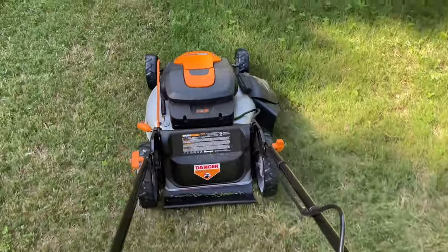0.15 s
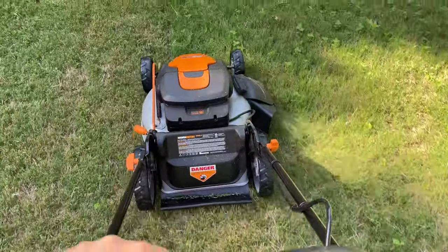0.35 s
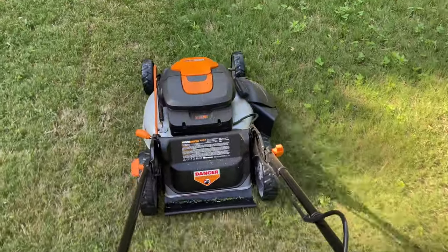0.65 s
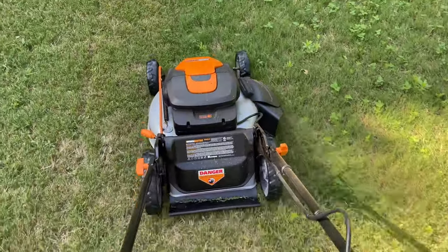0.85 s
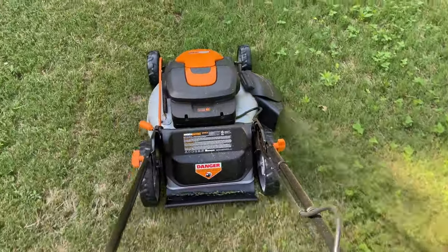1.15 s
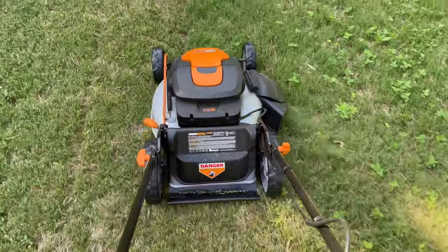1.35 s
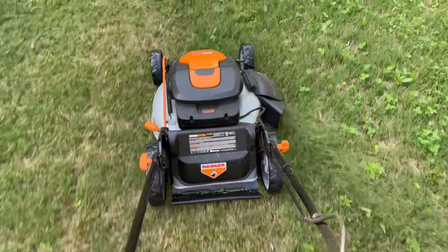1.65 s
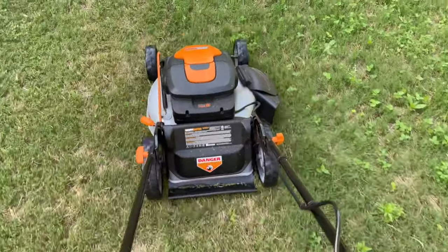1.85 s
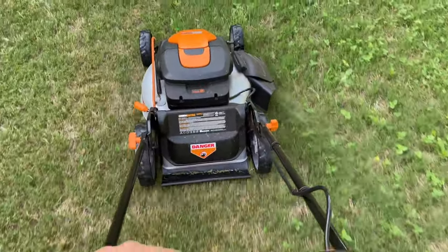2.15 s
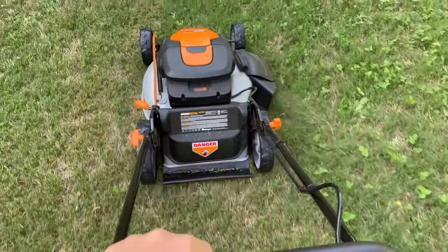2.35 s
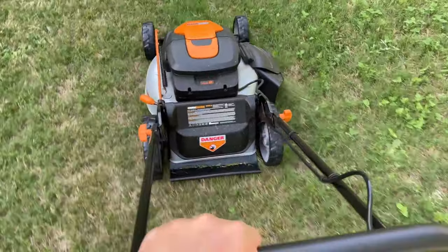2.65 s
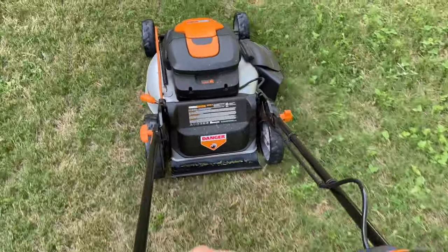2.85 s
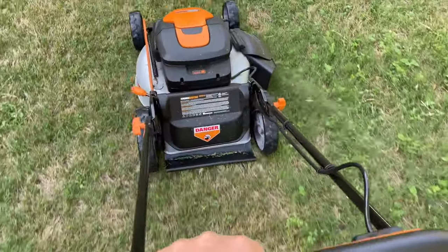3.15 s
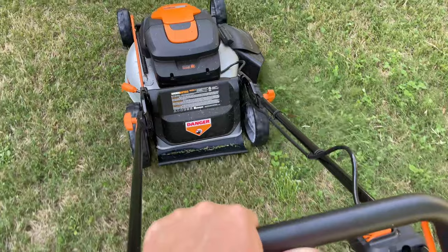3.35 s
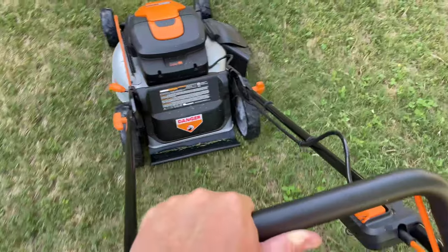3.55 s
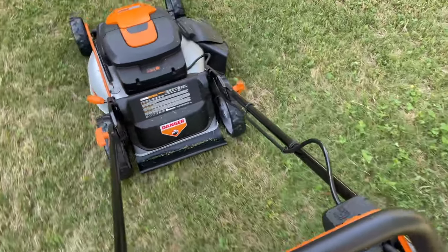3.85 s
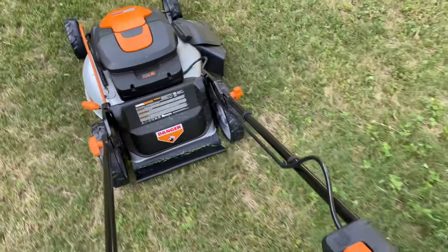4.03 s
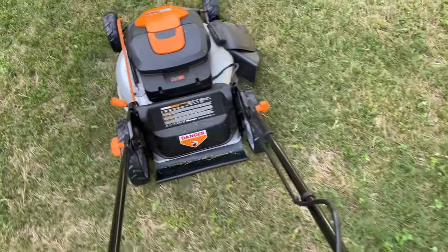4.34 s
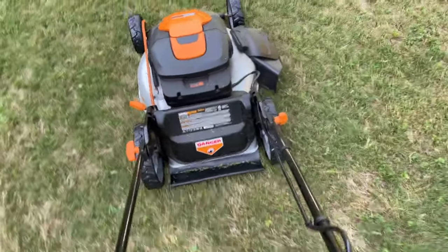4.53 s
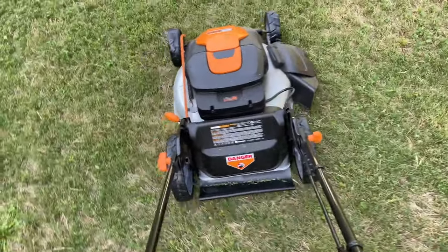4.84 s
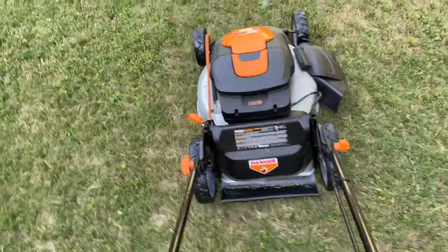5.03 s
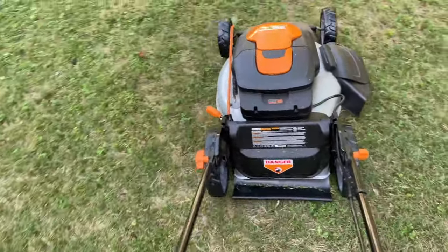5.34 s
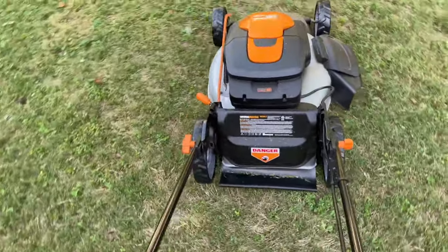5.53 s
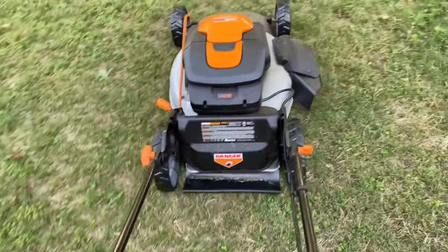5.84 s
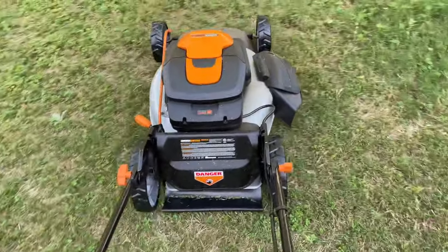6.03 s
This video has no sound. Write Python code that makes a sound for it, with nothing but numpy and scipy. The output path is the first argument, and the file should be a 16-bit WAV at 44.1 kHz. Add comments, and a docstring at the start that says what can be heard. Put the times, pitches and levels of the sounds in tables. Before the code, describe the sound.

A battery push mower drones close up through grass, with roaring air, hissing stalks and a brief crackle of a twig.

```python
"""Battery mower on dry grass

Close up, from the handle, on a two-port microphone that the wind bumps now and then. The blade drones
on multiples of its pass rate, air roars from the side chute, the deck rumbles and cut stalks hiss.
A twig rattles through; later the grass thins, the blade speeds up and the air roar takes over."""
import sys
import numpy as np
from scipy import signal
from scipy.fft import rfft, irfft, next_fast_len
from scipy.io import wavfile
from scipy.ndimage import uniform_filter1d, minimum_filter1d

SR = 44100
rng = np.random.default_rng(int(sys.argv[2]) if len(sys.argv) > 2 else 0)


def transcribe(u):
    """Save the signal u as a 16-bit wav file named by the first command-line argument.

    u: samples, shape (n,) or (channels, n), limited to [-1, 1]; the rate is SR.
    q: integer samples, one column per channel.
    """
    v = np.clip(np.atleast_2d(u).T, -1, 1)
    q = np.round(v * 32767).astype(np.int16)
    wavfile.write(sys.argv[1], SR, q)


N = 272979

# Blade: t/s, pass rate/Hz, first harmonic/dB, second harmonic/dB
BLADE_TRACK = [(0, 97.5, -32, -21), (.12, 96.5, -35, -23.5), (.25, 97.54, -36, -21.5),
               (.55, 97.6, -34.5, -22.5), (1.05, 94.34, -32, -24.5), (1.6, 95.5, -31.5, -22),
               (2.0, 97.64, -32, -22.5), (2.28, 96.4, -33, -20), (2.9, 96.6, -32, -22.5),
               (3.2, 97.64, -31.5, -22), (3.36, 96.5, -30.5, -20.5), (3.62, 97.96, -31, -23),
               (3.82, 99.86, -30.5, -18.5), (4.08, 101.2, -28.5, -17), (4.45, 103, -36.5, -18.5),
               (4.8, 104.2, -38, -17.5), (5.07, 103.9, -34.5, -16), (5.25, 104.2, -40.5, -16.5),
               (6.19, 105, -38, -16.5)]
# Strong harmonics: number, phase/rad, pan/dB (always left minus right), left lead in thin grass/rad
STRONG_HARMONICS = [(1, .5, 5.5, 1.3), (2, 0, 1.2, -.09), (3, 3.1, 1.3, -.26), (4, 2.7, .8, -1.2)]
# Weak harmonics: number, level in thick grass/dB, level in thin grass/dB
WEAK_HARMONICS = [(5, -39.5, -44), (6, -40, -39), (7, -44, -52), (10, -54, -35), (11, -59, -36.5),
                  (12, -46, -50.5)]
# Brief fades of one harmonic: t/s, number, depth/dB, half length/s
HARMONIC_FADES = [(0.015, 3, -9, 0.028), (0.143, 3, -16, 0.036), (0.388, 3, -12, 0.077),
                  (0.985, 3, -10, 0.077), (1.582, 3, -14, 0.027), (1.779, 3, -6, .05),
                  (2.121, 3, -13, 0.055), (2.518, 3, -14, 0.028), (2.78, 3, -14, 0.058),
                  (2.93, 3, -15, 0.039), (3.29, 3, -23, 0.032), (3.85, 3, -7.5, .1), (4.7, 3, -7, 0.035),
                  (4.866, 3, -8, 0.038), (5.35, 3, -1.5, .1), (.96, 1, -6.5, 0.049), (4.248, 1, -16, 0.094),
                  (3.965, 2, -3.5, 0.08), (1.048, 4, -12, 0.049), (1.898, 4, -8, 0.19),
                  (2.166, 4, -8, 0.034), (2.453, 4, -15, 0.024), (3.92, 4, -7, 0.17), (4.78, 4, -10, 0.13),
                  (5.32, 4, -13, .04), (6.05, 4, -15, .12)]
# Mowing noise: t/s, deck rumble/dB, chute roar/dB, stalk hiss/dB, chute howl/dB, howl pan/dB
NOISE_LEVELS = [(0, -30, -34, -38, -37.5, -4), (.4, -29, -33, -40.5, -34.5, -1),
                (.85, -27, -31.5, -36.5, -35.5, -0.5), (1.25, -30, -34, -40.5, -37, -3),
                (1.5, -30, -32, -37, -32.5, -2), (1.9, -31, -32, -40.5, -33, -2),
                (2.25, -28.5, -31, -37.5, -34.5, -1.5), (2.65, -29.5, -31, -38, -31.5, -1),
                (3.2, -30, -32.5, -39, -35.5, -0.5), (3.5, -29.5, -32.5, -42, -33.5, -1),
                (3.75, -31, -33, -48, -29, 0), (4.12, -32, -31.5, -53, -32, -0.5),
                (4.5, -34, -31.5, -50, -29, -2.5), (4.9, -33.5, -29.5, -46, -29.5, -6),
                (5.2, -31.5, -29.5, -55, -32, -14), (5.47, -33.5, -30, -56, -28.5, -10),
                (5.75, -32.5, -28.5, -56, -29, -6.5), (6.19, -33.5, -28, -47.5, -31.5, -10)]
# Noise spectra: f/Hz, relative density/dB
THICK_GRASS_ROAR = [(500, -36), (850, -7), (1150, -11.5), (1350, 2.5), (1750, -5.5), (2050, -3),
                    (2500, -11), (2800, -8), (3900, -16), (4800, -19), (6200, -20.5), (7500, -24),
                    (9000, -32), (16000, -52)]
THIN_GRASS_ROAR = [(450, -46), (800, 1.5), (1100, -9.5), (1500, 0), (1800, -6.5), (2050, -7), (2900, -10),
                   (4000, -13.5), (5000, -13), (6200, -17.5), (7500, -28.5), (9000, -53), (13500, -52),
                   (16000, -56)]
CHUTE_HOWL = [(600, -37), (900, 1.5), (1100, 12), (1300, 7), (1700, -67)]
DECK_RUMBLE = [(20, -45), (38, -29), (60, -11), (85, 3), (150, 4), (250, 12.5), (450, 7), (650, 4.5),
               (800, -7), (1100, -22)]
STALK_HISS = [(1500, -6), (3000, -7.5), (5000, 10.5), (7000, 2), (8200, 4.5), (10000, 3), (12500, -0.5),
              (14000, 6), (15500, -0.5), (17000, -33.5)]
# Blade on twig and hard stalks: t/s, peak rms level/dB, colour centre/Hz, t60/s, rise/s
BLADE_STRIKES = [(.095, -30, 11000, .03, .002), (.119, -26, 11000, .025, .002),
                 (.7215, -14.5, 4200, .036, .003), (.784, -25, 6800, .03, .002),
                 (.794, -25, 4800, .05, .002), (.8205, -14, 11000, .035, .0015),
                 (.8245, -14, 900, .045, .002), (.8445, -24, 12000, .035, .002),
                 (.860, -22, 5000, .06, .004), (.8965, -17, 12000, .025, .0015),
                 (.903, -9.5, 2900, .045, .007), (.950, -15.5, 4000, .025, .002),
                 (1.239, -32, 14000, .05, .004), (1.715, -24, 13000, .025, .002),
                 (1.828, -32, 12000, .05, .004), (2.146, -29, 11000, .03, .002),
                 (2.305, -30, 12000, .035, .002), (2.484, -28, 11000, .035, .002),
                 (2.695, -27, 14000, .035, .002), (2.717, -32, 4000, .03, .002),
                 (3.032, -27, 12000, .035, .002), (3.139, -32, 3500, .03, .002),
                 (3.54, -31, 12000, .05, .002), (4.615, -34, 13000, .035, .002),
                 (4.852, -31, 12000, .06, .002), (4.93, -37, 13000, .05, .004),
                 (4.96, -37, 13000, .04, .003), (5.0, -34, 13000, .035, .002),
                 (5.131, -32, 13000, .04, .004)]
# One twig knock, then low wind bumps on the ports: t/s, level/dB, f/Hz, t60/s, pan/dB
THUMPS = [(.8245, -12, 880, 0.034, 0), (1.92, -31, 79.7, 0.19, -10), (2.1, -29, 66.35, 0.21, 6),
          (3.799, -39, 106.6, 0.22, -19), (3.859, -33, 90, 0.16, -12)]
# Likeness of left and right, the highest treble heard in mono: f/Hz, coherence/0-1
STEREO_LIKENESS = [(40, .4), (100, .9), (250, .98), (600, .85), (830, .55), (1150, .9), (1750, .6),
                   (2800, .72), (4000, .25), (4800, .65), (5500, .2), (6000, .6), (7300, .3), (9000, .86),
                   (10800, .35), (11800, .985)]
# Phase between left and right: f/Hz, left lead/rad
STEREO_LEAD = [(500, 0), (1100, -.1), (1550, -.9), (2100, -.1), (2900, 1.4), (5000, 1.2), (5700, 3.6),
               (7000, 5.8), (7600, 3.7), (9200, 3.1), (10300, 2.4), (11300, .1), (11800, 0)]
# Balance of left and right: f/Hz, pan/dB
STEREO_PAN = [(45, 0), (80, 4), (120, 4), (180, 1.3), (650, 2), (1000, 0), (2500, -1.5), (4300, 0),
              (4800, 2), (7500, 1), (9000, -1), (11000, 0)]
# Shadow of the recorder's body: f/Hz, width/Hz, depth/dB
BODY_SHADOW = (5580, 214, -7.5)

FREE_HZ, SAG_HZ = 105, 8  # unloaded pass rate, and its drop in thick grass
THIRD_DB, FOURTH_DB = (-26, -27), (-35, -38)  # harmonics in (thick, thin) grass
CHUTE_PAN_DB = -3.5
THRESHOLD_DB, RECOVER_DB_PER_S, BAND_LIMIT_HZ = -24.5, 120, 15850
SIDES = np.array([[.5], [-.5]])  # splits a pan or a phase lead between left and right


def blade_drone(turn, first_db, second_db, thick):
    """Pressure pulses of the passing blade tips: strong harmonics, weak ones wavering with the grass."""
    fourth_db = by_grass(FOURTH_DB, thick) + 3 * wander(7.1)
    strong_db = [first_db, second_db, by_grass(THIRD_DB, thick), fourth_db]
    t, out = np.arange(N) / SR, np.zeros((2, N))
    for (k, phase, pan_db, lead), db in zip(STRONG_HARMONICS, strong_db):
        fade_db = sum(depth * np.exp(-((t - s) / half) ** 2)
                      for s, number, depth, half in HARMONIC_FADES if number == k)
        angle = k * turn + phase + .32 * wander(4.5) + lead * (1 - thick) * SIDES
        out += gain_of(db + fade_db + .81 * wander(20) + pan_db * SIDES) * np.cos(angle)
    lead = (.3 + .5 * (1 - thick) + .25 * wander(1.5)) * SIDES  # the source shifts across the ports
    for k, *levels_db in WEAK_HARMONICS:
        db = by_grass(levels_db, thick) + (1.07 + 2.4 * thick) * wander(12.4)
        jitter = (.046 * k + .4 * thick) * wander(17)
        out += gain_of(db) * np.cos(k * turn + jitter + 2 * np.pi * rng.random() + lead)
    return np.sqrt(2) * out


def chute_air(roar_db, howl_db, howl_pan_db, turn, thick):
    """Air leaves the side chute in one puff a pass and howls in its mouth; thick grass smears the puffs."""
    puffs = 1 + (.25 - .13 * thick) * np.cos(turn + 1.1)
    flutter_db = 1.5 * wander(30)  # the jet flaps in the mouth
    howl = gain_of(howl_db + flutter_db + howl_pan_db * SIDES) * stereo_noise(CHUTE_HOWL, patchy_db=1.25)
    rush = np.sqrt(thick) * stereo_noise(THICK_GRASS_ROAR, patchy_db=1.35)
    rush += np.sqrt(1 - thick) * stereo_noise(THIN_GRASS_ROAR, patchy_db=1.3)
    roar = gain_of(roar_db + .7 * wander(28) + CHUTE_PAN_DB * SIDES) * rush
    return (roar + howl) * puffs


def deck_rumble(db, turn):
    """Clippings and air tumble inside the housing, stirred at each pass."""
    surge_db = 1.2 * wander(10)
    return gain_of(db + surge_db) * stereo_noise(DECK_RUMBLE, patchy_db=2.5) * (1 + .011 * np.cos(turn))


def stalk_hiss(db, turn):
    """Many tiny snaps of cut stalks, a few of them large, merge into a hiss."""
    snap_db = 6.7 * np.minimum(rng.exponential(1, N), 2.8)
    snaps = gain_of(snap_db) * (rng.random(N) < 90 / SR)  # about 90 a second
    decay = gain_of(-60 * np.arange(900) / SR / .023)
    grain = evened(1 + .21 * signal.oaconvolve(snaps, decay)[:N])
    spray = stereo_noise(STALK_HISS, patchy_db=.8)
    return gain_of(db + 1.2 * wander(13)) * spray * grain * (1 + .1 * np.cos(turn + .8))


def blade_strikes():
    """The blade meets a twig or hard stalk: a short crackling burst around its own colour."""
    crack = stereo_noise([(300, -14), (1200, -6), (3000, 2), (6500, 2), (9000, -2), (16000, -2)],
                         patchy_db=1.5)
    jerks_db = 2.2 * evened(uniform_filter1d(rng.standard_normal(N), size=30))  # wood breaks in jerks
    crack *= gain_of(jerks_db)
    size = 4096
    out, t, hz = np.zeros((2, N + size)), np.arange(size) / SR, np.fft.rfftfreq(size, 1 / SR)
    for s, db, centre_hz, t60, rise in BLADE_STRIKES:
        at = round(s * SR)
        colour_db = 13 * np.exp(-(np.log((hz + 1) / centre_hz) / .7) ** 2)
        burst = irfft(rfft(crack[:, at:at + size]) * gain_of(colour_db))
        swell = np.minimum(t / rise, 1) * gain_of(-60 * np.maximum(t - rise, 0) / t60)
        out[:, at:at + size] += gain_of(db) * evened(burst * swell) * np.sqrt(np.mean(swell ** 2))
    return out[:, :N]


def thumps():
    """Low wind bumps on the microphone ports, and one higher knock from the twig."""
    t, out = np.arange(N) / SR, np.zeros((2, N))
    for s, db, hz, t60, pan_db in THUMPS:
        age = np.maximum(t - s, 0)
        tone = np.sin(2 * np.pi * hz * age) * np.minimum(age * hz, 1)
        out += gain_of(db - 60 * age / t60 + pan_db * SIDES) * tone
    return out


def stereo_noise(spectrum, patchy_db):
    """Noise of rms 1 with drifting patches, partly alike in left and right."""
    frames, hz = N // 256 + 5, np.fft.rfftfreq(1024, 1 / SR)
    a, b, c, d, patches = rng.standard_normal((frames, 513, 5)).T
    patches = uniform_filter1d(patches, size=12, axis=0)  # across frequency
    patches = evened(uniform_filter1d(patches, size=10, axis=1))  # across time
    right, unrelated = a + 1j * b, c + 1j * d
    alike = at_hz(STEREO_LIKENESS, hz)
    left = alike * right * np.exp(1j * at_hz(STEREO_LEAD, hz)) + np.sqrt(1 - alike ** 2) * unrelated
    tilt = gain_of(at_hz(STEREO_PAN, hz) / 2)
    pair = np.array([left * tilt, right / tilt]) * gain_of(at_hz(spectrum, hz) + patchy_db * patches)
    return evened(signal.istft(pair, nperseg=1024, noverlap=768)[1][:, :N])


def wander(rate_hz):
    """Random drift of rms 1, mostly slower than the given rate."""
    steps = np.arange(2048)
    rolloff = 1 + (steps[:1025] * SR / N / rate_hz) ** 4
    slow = irfft(rfft(rng.standard_normal(2048)) / rolloff)
    return np.interp(np.linspace(0, 2047, N), steps, evened(slow))


def by_grass(levels, thick):
    """Blends a (thick grass, thin grass) pair."""
    return thick * levels[0] + (1 - thick) * levels[1]


def gain_of(db):
    """Decibels to a factor."""
    return 10 ** (np.asarray(db) / 20)


def evened(x):
    """Scales to rms 1."""
    return x / np.sqrt(np.mean(abs(x) ** 2) + 1e-20)


def at_hz(points, hz):
    """Reads a table on a log-frequency axis, as a column."""
    f, value = np.transpose(points)
    return np.interp(np.log(hz + 1), np.log(f + 1), value)[:, None]


def curves(rows):
    """Each column of a timed table as a value per sample."""
    s, *columns = np.transpose(rows)
    return [np.interp(np.arange(N) / SR, s, c) for c in columns]


def scene():
    """The mower from the handle, its drone and noise pulsing with the blade."""
    pass_hz, first_db, second_db = curves(BLADE_TRACK)
    rumble_db, roar_db, hiss_db, howl_db, howl_pan_db = curves(NOISE_LEVELS)
    turn = 2 * np.pi * np.cumsum(pass_hz) / SR  # one cycle a blade pass
    thick = np.clip((FREE_HZ - pass_hz) / SAG_HZ, 0, 1)  # thick grass slows the blade
    hum = blade_drone(turn, first_db, second_db, thick) + deck_rumble(rumble_db, turn)
    air = chute_air(roar_db, howl_db, howl_pan_db, turn, thick)
    return hum + air + stalk_hiss(hiss_db, turn) + blade_strikes() + thumps()


def record(dry):
    """At the microphone: the body's shadow, gain control that ducks after bright peaks, a band limit."""
    size = next_fast_len(N)
    hz = np.fft.rfftfreq(size, 1 / SR)
    dip_hz, width_hz, dip_db = BODY_SHADOW
    shadow = gain_of(dip_db * np.exp(-((hz - dip_hz) / width_hz) ** 2))
    heard = irfft(rfft(dry, size) * shadow, size)[:, :N]
    bright = signal.sosfilt(signal.butter(2, [1800, 5000], "band", fs=SR, output="sos"), heard)
    power = signal.lfilter([.001], [1, -.999], (bright ** 2).mean(0))
    over_db = np.maximum(10 * np.log10(power + 1e-12) - THRESHOLD_DB, 0)
    held_db = -minimum_filter1d(-over_db, size=4001, origin=2000)  # holds for 90 ms
    fall_db = np.arange(N) * RECOVER_DB_PER_S / SR
    released_db = np.maximum.accumulate(held_db + fall_db) - fall_db
    late_db = uniform_filter1d(np.r_[np.zeros(350), released_db[:-350]], size=501, origin=250)
    ducked = heard / gain_of(.9 * late_db)
    lowpass = signal.firwin(511, BAND_LIMIT_HZ, window=("kaiser", 9), fs=SR)
    return signal.oaconvolve(ducked, lowpass[None], "same")


dry = scene()
out = record(dry)
transcribe(out)
```